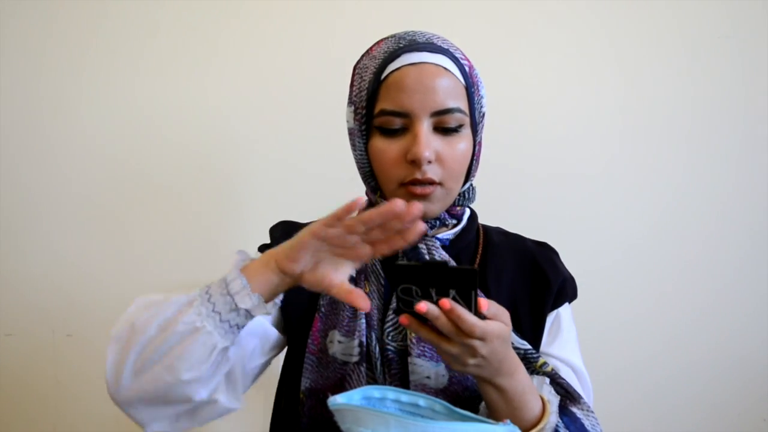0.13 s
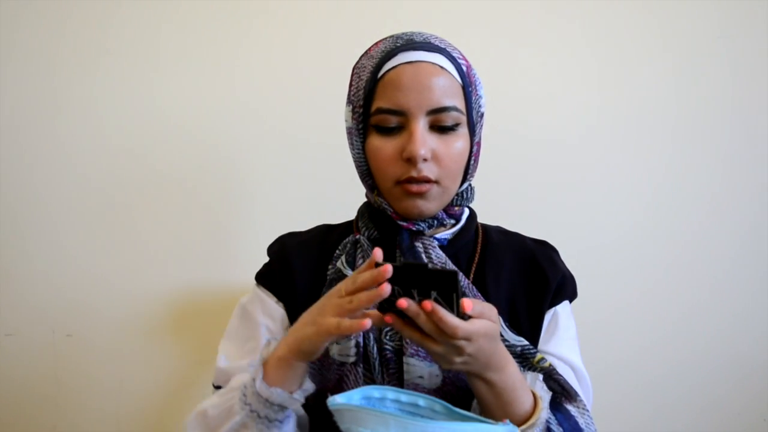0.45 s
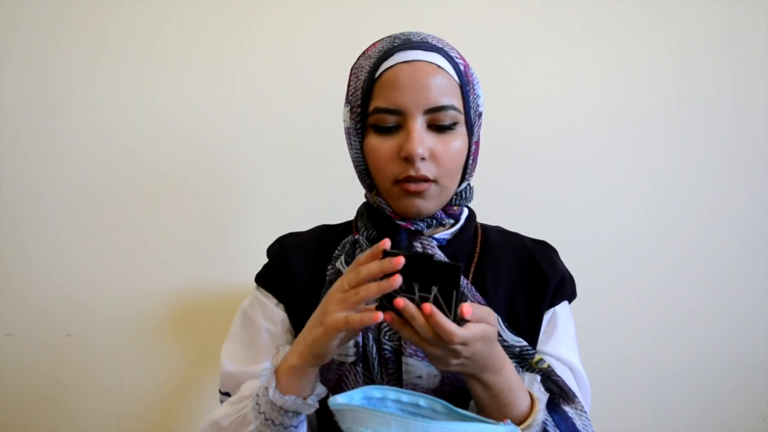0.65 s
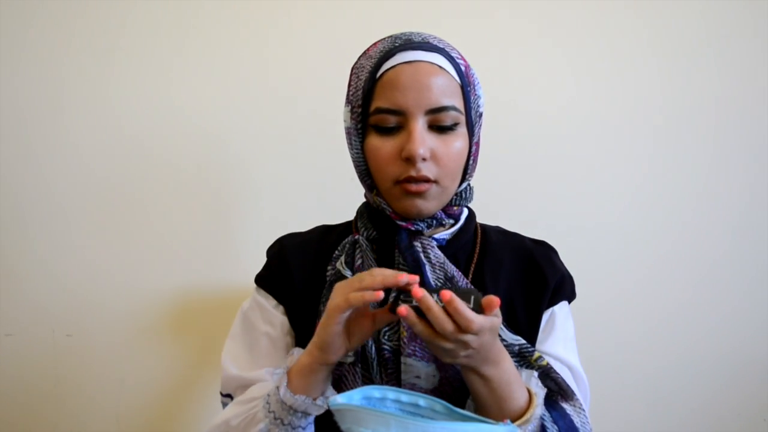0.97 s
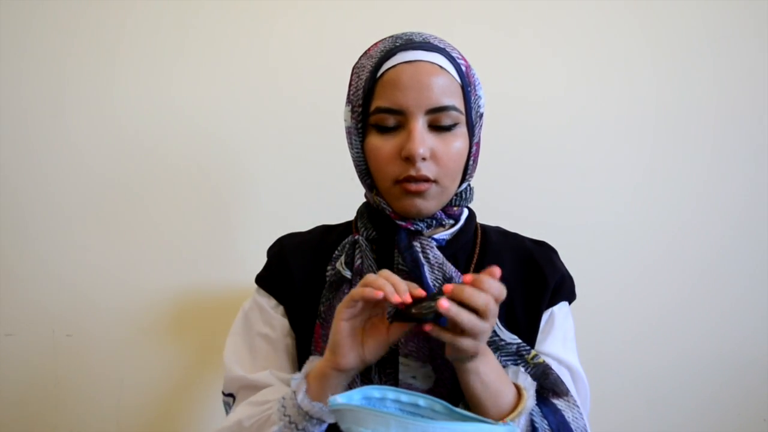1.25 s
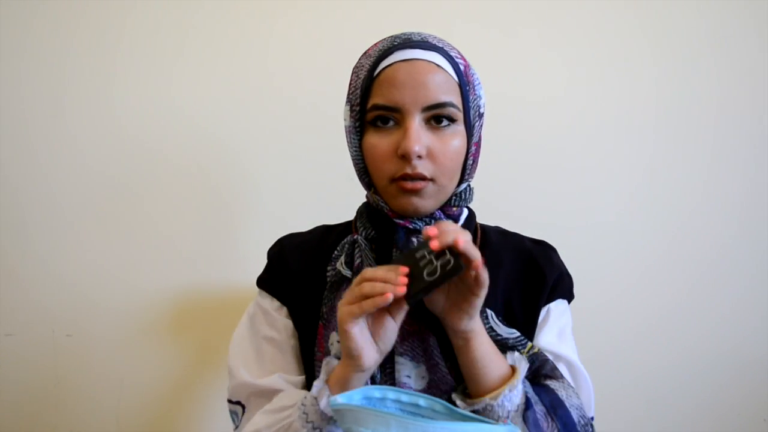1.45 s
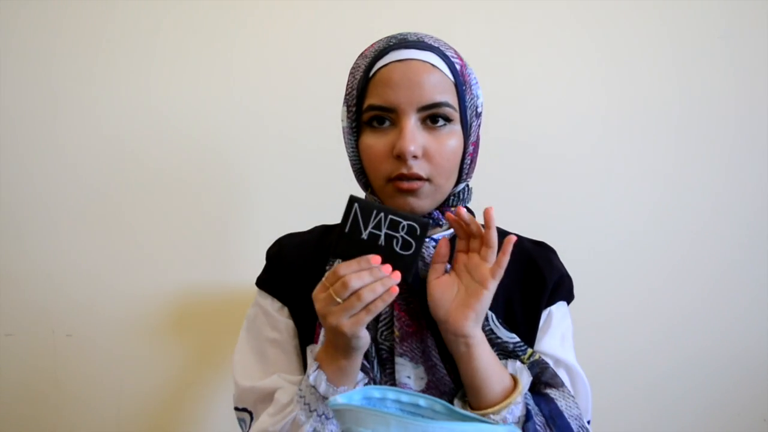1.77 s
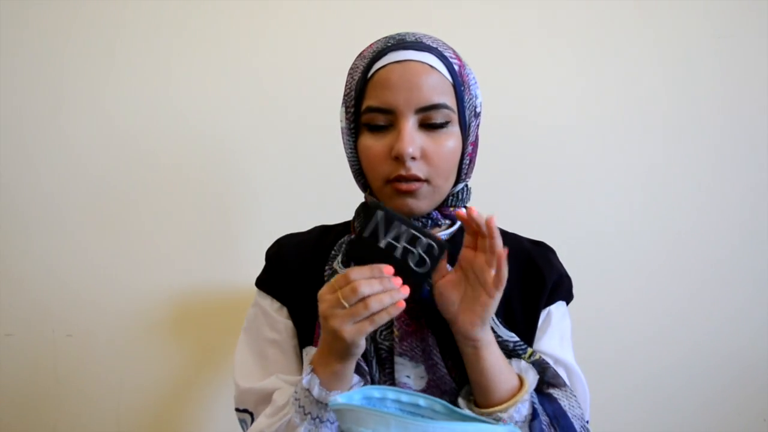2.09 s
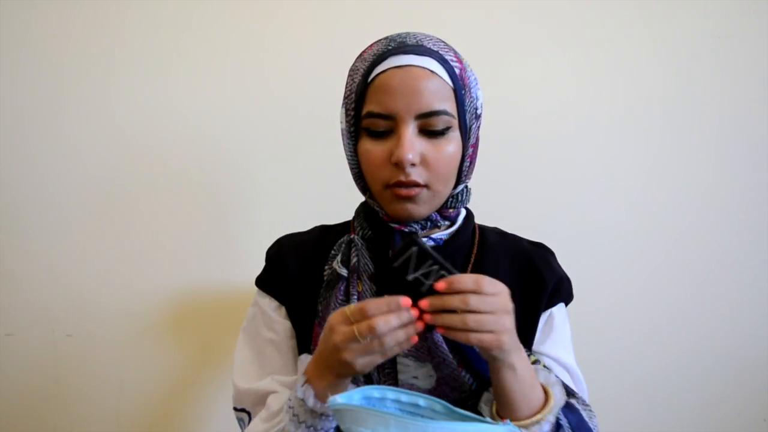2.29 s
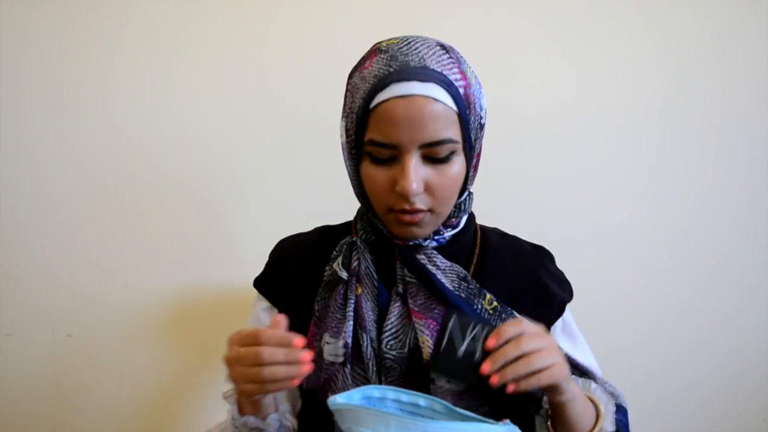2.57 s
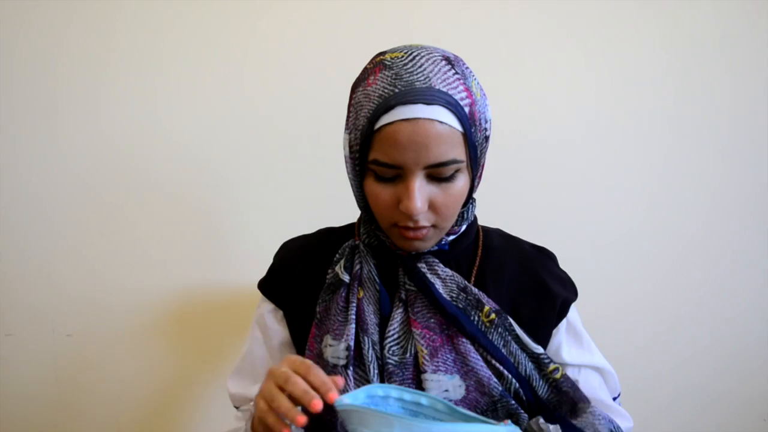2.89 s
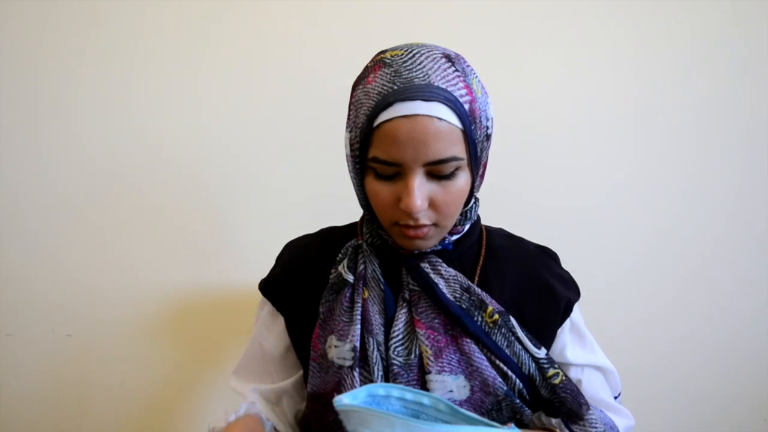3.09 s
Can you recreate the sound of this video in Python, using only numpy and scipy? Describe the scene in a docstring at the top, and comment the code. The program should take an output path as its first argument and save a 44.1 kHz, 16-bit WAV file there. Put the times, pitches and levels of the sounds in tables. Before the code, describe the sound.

Hard plastic case snap with a brief clattering click, later a sharp knock and tiny tick

```python
"""A plastic case snaps shut: dense random clicks and hard snaps, coloured by the lid's spectrum.
A case is later knocked down among others: contact pulses ring short body modes; one pitched tick follows.
Before both, fingers brush the case: soft coloured clicks. A bare, quiet room answers with decaying noise.
A small camera microphone hisses (shaped stereo noise), clips the peaks and ducks after loud sounds."""
import sys
import numpy as np
from scipy import signal
from scipy.fft import rfft, irfft
from scipy.io import wavfile
from scipy.ndimage import uniform_filter1d

SR = 44100
rng = np.random.default_rng(int(sys.argv[2]) if len(sys.argv) > 2 else 0)


def generate_wav(sig):
    """Save sig (samples, or channels by samples) to the path in sys.argv[1] as 16-bit PCM at SR."""
    pcm = np.round(np.clip(np.atleast_2d(sig).T, -1, 1) * 32767).astype(np.int16)
    wavfile.write(sys.argv[1], SR, pcm)


N = 143325

# clatter of the lid: (time [s], level [dB])
LID_CLATTER = [(1.9599, -23), (1.967, -34), (1.9705, -34), (1.9712, -14), (1.984, -9), (2.0, -7),
               (2.012, -13.5), (2.03, -42)]
# single hard snaps of the lid: (time [s], level [dB])
LID_SNAPS = [(1.9603, -11), (1.9711, 4), (1.978, -1), (1.9858, 3.5), (2.0015, 7.5)]
# lid spectrum: (frequency [Hz], relative density [dB per Hz])
LID_SPECTRUM = [(60, -48), (120, -36), (275, -28), (500, -15.5), (660, -13), (810, -1.5), (1000, -11.5),
                (1300, -10), (1700, -5), (2150, -3), (2600, -7), (3300, -5.5), (4200, -4.5), (5600, -8.5),
                (10100, -8.5), (12000, -11.5), (14200, -31), (15400, -43)]
# stereo spread of the lid: (frequency [Hz], side minus mid [dB])
LID_SIDE_MID = [(60, -7.5), (110, -7), (200, -12), (380, -21.5), (700, -25), (1290, -40), (2380, -20.5),
                (4400, -20.5), (8120, -9), (15000, -4)]
# blows on the case body, the last row (2.9713 s) an early echo of the knock off a nearby surface: (time [s],
# level [dB], contact [ms], brightness tilt [dB per octave])
BODY_KNOCKS = [(2.9571, -24, .4, 0), (2.9588, -2.5, 0.22, -4), (2.9593, 3.5, .17, 7),
               (2.9598, 5.5, 0.34, 0), (2.9626, -15, 0.32, 16), (2.9652, -17, .3, -1),
               (2.9684, -18, .25, 1.5), (2.9713, -8.5, .3, -1)]
# ringing modes of the case body: (frequency [Hz], relative level [dB], t60 [s])
BODY_MODES = [(710, -29, .016), (1148, 5.5, .017), (1550, -4, .007), (2300, -0.5, 0.0064), (3050, 1, .004),
              (3900, -9.5, 0.0028), (5300, -20, .003), (7800, -29, .003), (10800, -36, .003)]
# what the knocks send into the room: (frequency [Hz], relative density [dB per Hz])
KNOCK_AIR_SPECTRUM = [(150, -52), (240, -30), (340, -3), (650, 0.5), (1250, -0.5), (1550, -1.5),
                      (2000, -12.5), (2450, -8), (2900, -9), (3400, -18), (4300, -21), (5100, -19.5),
                      (5800, -30.5), (7200, -38), (8100, -48), (10600, -37), (15000, -92)]
# fingers on the case: (time [s], level [dB])
BRUSH_LEVEL = [(.835, -60), (.85, -40), (.856, -44), (.865, -40.5), (.875, -41.5), (.91, -61)]
# brush spectrum: (frequency [Hz], relative density [dB per Hz])
BRUSH_SPECTRUM = [(500, -26), (1000, 1), (1300, 6.5), (2000, -3), (3300, -4.5), (5000, -15), (8000, -18),
                  (12000, -36)]
# decay off the near walls: (frequency [Hz], t60 [s])
NEAR_DECAY = [(200, 0.29), (500, .33), (900, 0.33), (1500, 0.63), (2100, 0.73), (3000, 0.56), (4500, 0.57),
              (8000, 0.44), (14000, 0.27)]
# faint long tail: (frequency [Hz], t60 [s])
FAR_DECAY = [(200, 0.78), (1000, 2.6), (2000, 1.82), (5000, 1.15), (12000, 0.52)]
# likeness of the room tail left and right: (frequency [Hz], left-right correlation [0-1])
ROOM_LIKENESS = [(60, 0.88), (150, 1), (380, 1), (950, 1), (2380, 0.99), (5980, 1), (15000, 0.29)]
# room tone and microphone hiss: (frequency [Hz], relative density [dB per Hz])
HISS_SPECTRUM = [(12, -78), (20, -47), (70, -20), (106, -13.5), (166, -7), (361, -3), (596, -3), (832, -1),
                 (905, -1.5), (1490, -4.5), (2080, -6), (7090, -17), (11400, -26.5), (15400, -45)]
# broad low bumps in the room tone: (frequency [Hz], width [Hz], boost [dB])
HUM_BUMPS = [(100, 13, 9.5), (221, 41, 5.5)]
# likeness of the hiss left and right: (frequency [Hz], left-right correlation [0-1])
HISS_LIKENESS = [(60, 0.99), (150, 1), (380, 0.87), (950, 0.72), (2380, 0.32), (5980, 0.11), (15000, 0.11)]
# stereo balance of room tails and hiss: (frequency [Hz], left minus right [dB])
BALANCE = [(60, 9.5), (110, -0.5), (200, 1.5), (380, 0.5), (700, 1), (1290, 0), (2380, 0), (4400, 0.5),
           (8120, 0), (15000, 2.5)]

CLICKS_PER_S, CLICK_SPREAD_DB = 5000, 2.5
LID_ROOM_DB, LID_FAR_DB, LID_CUT_S, LID_TAILS = 0, -21.5, 0.23, 11
BODY_LOW_HZ = 267
KNOCK_ROOM_DB, KNOCK_FAR_DB, KNOCK_CUT_S = -2, -35, 0.16
TICK_S, TICK_DB, TICK_HZ, TICK_RISE_S, TICK_ROOM_DB = 3.0066, -11, 2550, 0.0013, -9
BRUSH_ROOM_DB = -8.5
GAP_S, BUILD_S, CUT_DB, TURN_S = 0.0026, 0.01, -11.5, 0.004
HISS_RMS_DB = -45
DUCK_FROM_DB, DUCK_SHARE, DUCK_S, RECOVER_DB_PER_S, START_DUCK_DB = -28, 0.098, 0.05, 1.76, 1.5
EDGE_HZ = 15600


def lid():
    """Dense clicks and hard snaps share the lid's colour; sign-flipped copies add a left-right side signal."""
    train = clicks(LID_CLATTER)
    for time_s, level_db in LID_SNAPS:
        train[round(time_s * SR)] += amp(level_db)
    hz = np.fft.rfftfreq(N, 1 / SR)
    flipped = train * rng.choice([-1., 1.], N)
    side = irfft(rfft(flipped) * amp(read(LID_SIDE_MID, hz)), N)
    direct = train + [[1], [-1]] * side
    tail = room(train, LID_FAR_DB, LID_CUT_S, count=LID_TAILS)
    both = direct + amp(LID_ROOM_DB) * tail
    return signal.oaconvolve(both, shade(LID_SPECTRUM)[None], axes=1)[:, :N]


def knocks():
    """Each blow pushes for its contact time and rings the short body modes; the room answers all as one."""
    t, body = np.arange(2000) / SR, np.zeros(N)
    for time_s, level_db, contact_ms, tilt_db in BODY_KNOCKS:
        ring = np.zeros(len(t))
        for hz, mode_db, t60_s in BODY_MODES:
            start_db = mode_db + tilt_db * np.log2(hz / 1500)
            ring += amp(start_db - 60 * t / t60_s) * np.sin(2 * np.pi * hz * t)
        push = np.sin(np.pi * np.minimum(t * 1000 / contact_ms, 1)) ** 2
        ring = np.convolve(ring, push)[:len(t)]
        body[round(time_s * SR):][:len(t)] += amp(level_db) * ring / abs(ring).max()
    body = signal.lfilter(*signal.butter(2, BODY_LOW_HZ, "high", fs=SR), body)
    # one coloured impulse at the peak, with the energy of all knocks, feeds the room
    air, colour = np.zeros(N), shade(KNOCK_AIR_SPECTRUM)
    air[np.argmax(abs(body)):][:len(colour)] = colour * np.linalg.norm(body)
    return body + amp(KNOCK_ROOM_DB) * room(air, KNOCK_FAR_DB, KNOCK_CUT_S)


def tick():
    """One short sine burst: smooth rise, exponential fall, and its room tail."""
    u = np.maximum(np.arange(N) / SR - TICK_S, 0) / TICK_RISE_S
    envelope = (u * np.exp(1 - u)) ** 2
    direct = amp(TICK_DB) * envelope * np.sin(2 * np.pi * TICK_HZ * TICK_RISE_S * u)
    return direct + amp(TICK_ROOM_DB) * room(direct, KNOCK_FAR_DB, KNOCK_CUT_S)


def brush():
    """Skin scrapes softly on plastic: dense coloured clicks and their room tail."""
    direct = signal.oaconvolve(clicks(BRUSH_LEVEL), shade(BRUSH_SPECTRUM))[:N]
    return direct + amp(BRUSH_ROOM_DB) * room(direct, KNOCK_FAR_DB, KNOCK_CUT_S)


def room(x, far_db, cut_s, count=1):
    """Reflections build up after a gap and decay; a gate-like fade cuts them short over a faint long tail.

    The source feeds count different random tails in turn, TURN_S each, for a smoother, denser tail."""
    def level(hz, t):
        near = amp(-60 * t / read(NEAR_DECAY, hz) + CUT_DB * (t / cut_s) ** 6)
        far = amp(far_db - 60 * t / read(FAR_DECAY, hz))
        return np.hypot(near, far)
    out = np.zeros((2, N))
    turn = (np.arange(N) / SR / TURN_S).astype(int) % count
    build = np.clip((np.arange(SR) / SR - GAP_S) / BUILD_S, 0, 1) ** 2
    for k in range(count):
        tail = noise(SR, size=256, same=ROOM_LIKENESS, level=level) * build
        tail = tail / np.linalg.norm(tail[0])
        out += signal.fftconvolve((x * (turn == k))[None], tail, axes=1)[:, :N]
    return out


def hiss():
    """Steady room tone and microphone hiss: stereo noise with a fixed spectrum."""
    def level(hz, t):
        return amp(read(HISS_SPECTRUM, hz) + bumps(hz, HUM_BUMPS) + 0 * t)
    return amp(HISS_RMS_DB) * unit(noise(N, size=8192, same=HISS_LIKENESS, level=level))


def clicks(curve):
    """Dense uneven clicks of random sign under a level curve."""
    time_s, level_db = np.transpose(curve)
    hit = rng.random(N) < CLICKS_PER_S / SR
    size, sign = rng.exponential(1, N), rng.choice([-1., 1.], N)
    train = sign * hit * amp(CLICK_SPREAD_DB * np.minimum(size, 4))
    return unit(train) * amp(np.interp(np.arange(N) / SR, time_s, level_db, left=-200, right=-200))


def noise(length, size, same, level):
    """Stereo noise with magnitude level(hz, t) and left-right correlation same, built by inverse STFT."""
    hop = size // 4
    frames, hz = length // hop + 5, np.fft.rfftfreq(size, 1 / SR)[:, None]
    a, b, c, d = rng.standard_normal((frames, len(hz), 4)).T
    left, other = a + 1j * b, c + 1j * d
    k = np.clip(read(same, hz), -1, 1)
    z = np.array([left, k * left + np.sqrt(1 - k ** 2) * other])
    balance_db = read(BALANCE, hz)
    z = z * level(hz, np.arange(frames) * hop / SR) * amp(np.array([balance_db, -balance_db]) / 2)
    return signal.istft(z, nperseg=size, noverlap=size - hop)[1][:, :length]


def shade(points):
    """Unit-energy impulse for a spectrum table."""
    return causal(read(points, np.fft.rfftfreq(4096, 1 / SR)))


def causal(db):
    """Minimum-phase impulse of energy 1 from a dB response, floored at -100 dB."""
    log = np.log(amp(np.maximum(np.r_[db, db[-2:0:-1]], -100)))
    h = np.fft.ifft(np.exp(np.conj(signal.hilbert(log)))).real[:len(db)]
    return h / np.linalg.norm(h)


def bumps(hz, rings):
    """Sum of resonance-shaped boosts in dB."""
    return sum(boost_db / (1 + (2 * (hz - f) / width) ** 2) for f, width, boost_db in rings)


def read(points, hz):
    """Table value at hz, interpolated over log frequency."""
    f, value = np.transpose(points)
    return np.interp(np.log(hz + 1), np.log(f + 1), value)


def amp(db):
    """dB to amplitude."""
    return 10 ** (np.asarray(db) / 20)


def unit(x):
    """Scale to RMS 1."""
    return x / np.sqrt(np.mean(x ** 2) + 1e-20)


def scene():
    """Sum of all sources."""
    return lid() + knocks() + tick() + brush() + hiss()


def record(dry):
    """Gain control ducks after loud sounds and recovers slowly; peaks clip; a low-pass limits the band."""
    power_db = 10 * np.log10(abs(uniform_filter1d((dry ** 2).mean(0), 800)) + 1e-12)
    want_db = DUCK_SHARE * np.maximum(power_db - DUCK_FROM_DB, 0)
    want_db[0] = START_DUCK_DB
    # hold the deepest duck, released at a constant dB rate
    recovery_db = np.arange(N) * RECOVER_DB_PER_S / SR
    held_db = np.maximum(np.maximum.accumulate(want_db + recovery_db) - recovery_db, 0)
    r = np.exp(-1 / (DUCK_S * SR))
    duck_db = signal.lfilter([1 - r], [1, -r], held_db - held_db[0]) + held_db[0]
    clipped = np.clip(dry / amp(duck_db), -1, 1)
    low_pass = signal.firwin(511, EDGE_HZ, window=("kaiser", 9), fs=SR)
    return np.clip(signal.oaconvolve(clipped, low_pass[None], "same"), -1, 1)


dry = scene()
out = record(dry)
generate_wav(out)
```